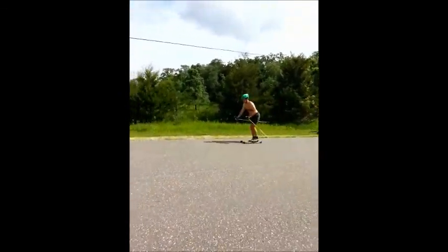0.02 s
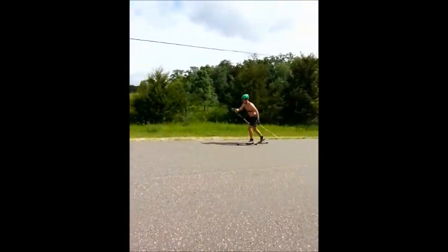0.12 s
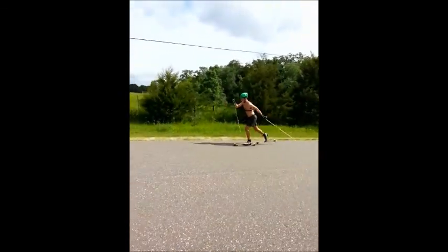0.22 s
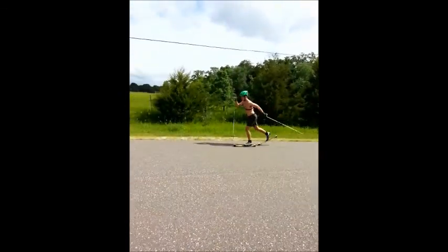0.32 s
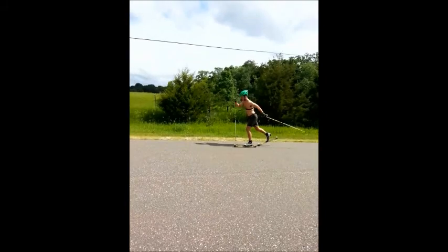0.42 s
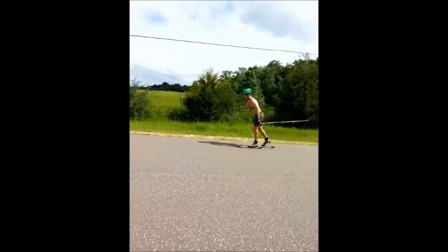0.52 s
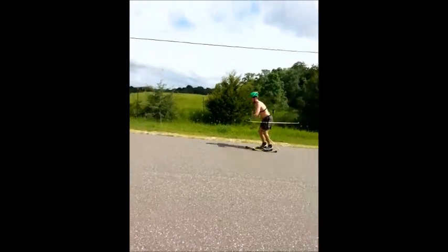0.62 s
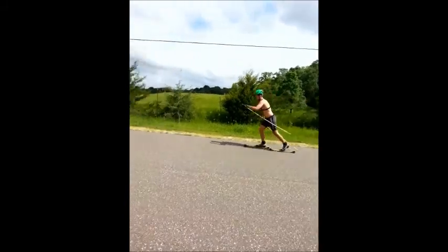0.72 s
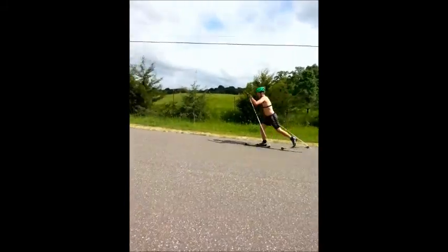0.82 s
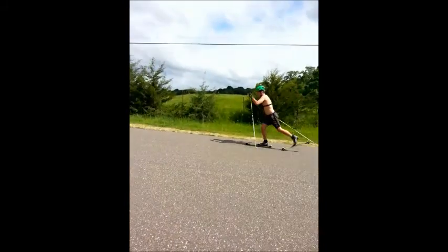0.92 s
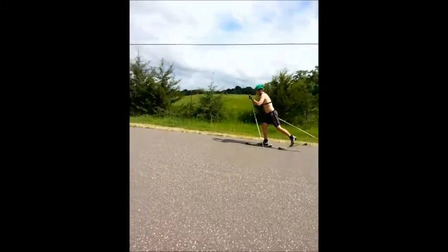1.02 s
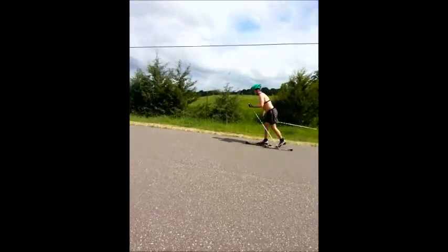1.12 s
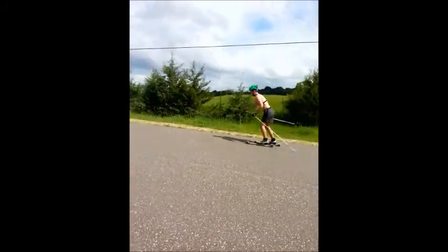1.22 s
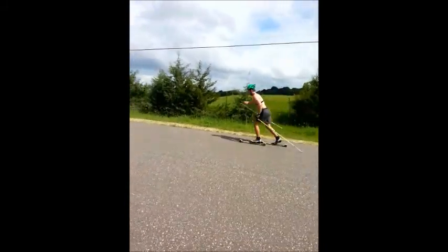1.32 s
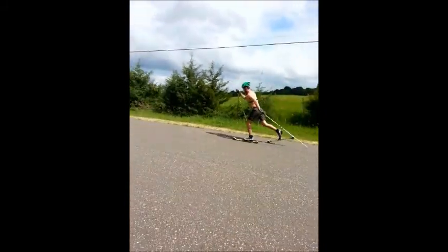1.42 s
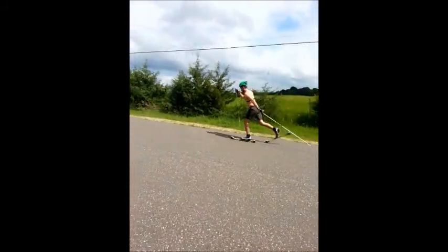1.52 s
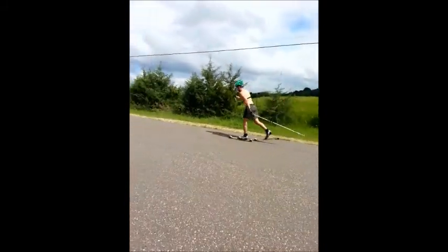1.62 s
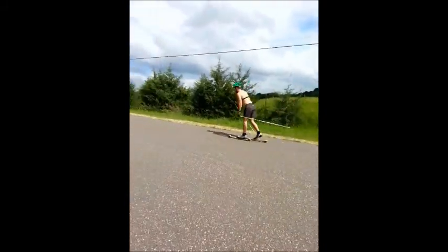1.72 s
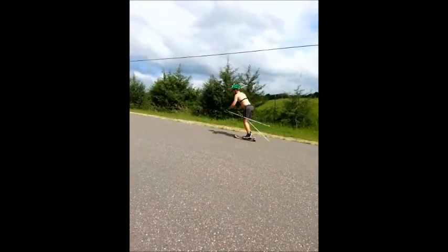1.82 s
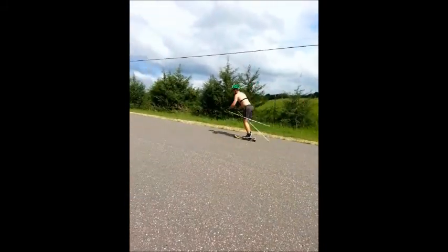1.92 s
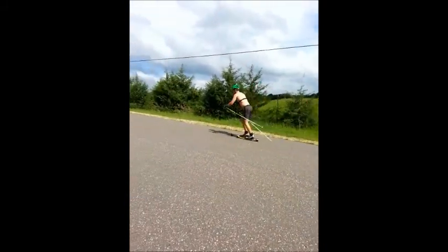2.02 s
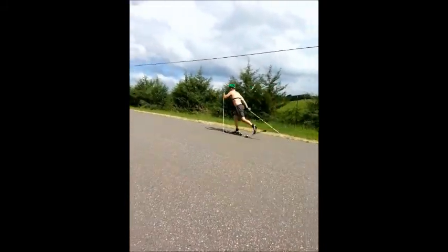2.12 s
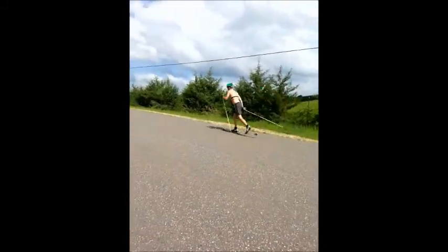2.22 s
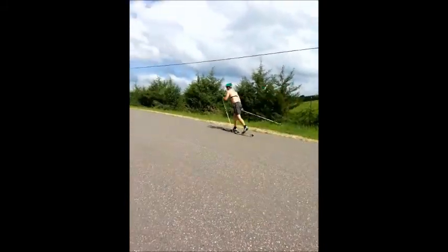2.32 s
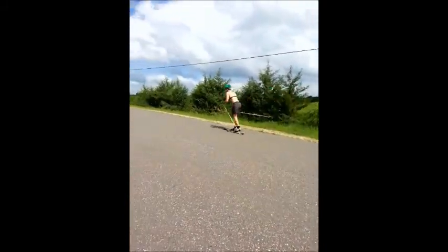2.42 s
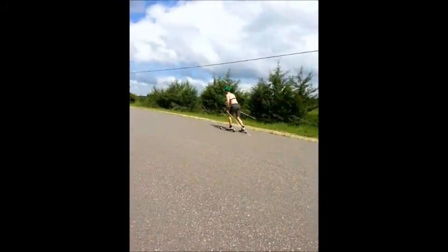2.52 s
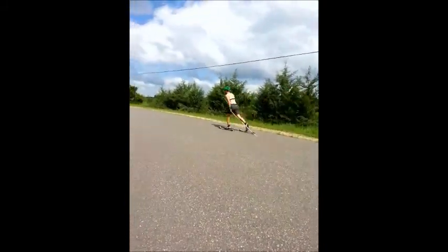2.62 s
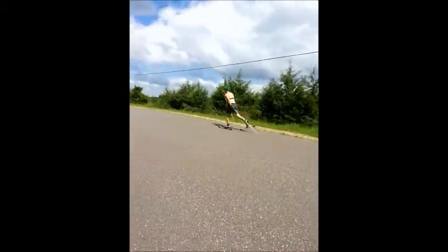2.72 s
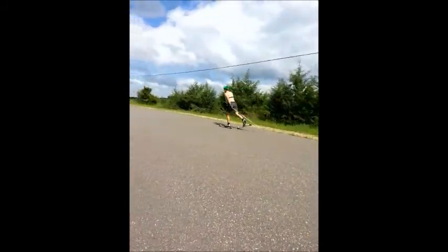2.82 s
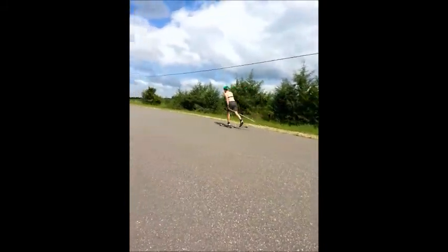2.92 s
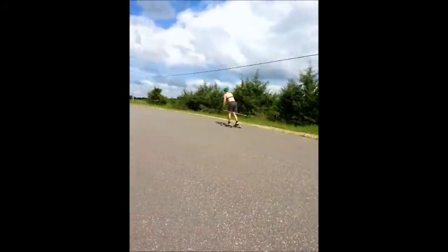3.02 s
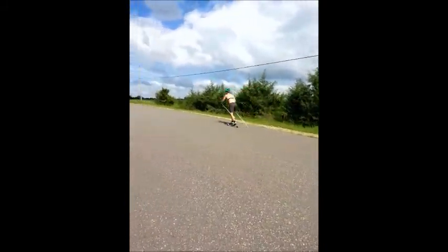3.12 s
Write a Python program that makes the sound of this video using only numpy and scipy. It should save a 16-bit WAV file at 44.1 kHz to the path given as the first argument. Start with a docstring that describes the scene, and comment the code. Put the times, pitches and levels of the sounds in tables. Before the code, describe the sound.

Roller ski pole tips click sharply on asphalt, over wind thumps and high insect drone.

```python
"""Roller skier on an asphalt road

Steel pole tips strike and bounce, and the skis slap down in turn, each ringing briefly.
The wheels hiss on the rough road, and something on the gear ticks in runs, once a stride.
Insects drone in the verge and gusts of wind thump on the microphone."""
import sys
import numpy as np
from scipy import signal
from scipy.fft import rfft, irfft, next_fast_len
from scipy.io import wavfile
from scipy.ndimage import map_coordinates

SR = 44100
rng = np.random.default_rng(int(sys.argv[2]) if len(sys.argv) > 2 else 0)


def generate_wav(signal):
    """Clip the signal to [-1, 1] and save it as 16-bit WAV at the path in sys.argv[1]."""
    frames = np.transpose(np.atleast_2d(signal))
    scaled = np.clip(frames, -1, 1) * 32767
    pcm = np.round(scaled).astype(np.int16)
    wavfile.write(sys.argv[1], SR, pcm)


N = 138915

# The tones a pole rings with: pitch_hz, level_db, fade_s (time to fall by 60 dB)
POLE_TONES = [(695, -13, 0.036), (1213, -2, 0.016), (1568, -3, 0.012), (2270, -7.5, 0.02),
              (2557, -4.5, 0.0065), (3090, -6.5, 0.018), (4440, -12, 0.021), (5580, -8.5, 0.024),
              (7000, -6.5, 0.0041), (11400, -18.5, 0.026)]
# Tip hits and bounces: start_s, level_db, knock_db, treble_db (both added to the level), ring_hz
POLE_HITS = [(0.1234, -37, 0, -3, 1180), (.135, -32.5, -7, -0.5, 2700), (0.4042, -21.5, -13.5, -7, 2520),
             (0.4142, -29.5, -31, -7, 3100), (0.7464, -24.5, -3.5, -4.5, 2530),
             (.756, -21.5, -5, -2.5, 2870), (0.967, -35, 1, -18, 2190), (0.9758, -19, -1, -6.5, 2290),
             (0.9855, -23.5, -2, -6.5, 2300), (1.023, -25.5, -10, -11, 2260),
             (1.0314, -21.5, -14.5, -11, 2330), (1.136, -34, 0.5, -20, 1050),
             (1.334, -29.5, -13, -3.5, 2443), (1.344, -29, -14, -4, 3070), (1.6209, -29, -4.5, -7.5, 1940),
             (1.6305, -25, -11.5, -16, 1980), (1.641, -29, -11, -6, 2995), (1.649, -31, -10, -9, 2330),
             (1.6591, -30, -13, -17, 2980), (1.69, -28.5, -15, -10.5, 2950), (1.9594, -23, -10.5, -5, 1920),
             (1.9692, -22.5, -4, -0.5, 3260), (2.179, -29.5, -1.5, -4.5, 1550),
             (2.188, -14, -10.5, -11.5, 2030), (2.1981, -22, -10, -9, 1970), (2.572, -36, -0.5, 1, 1490),
             (2.5828, -33.5, -9, 1, 1920), (2.7843, -41, 0.5, -5.5, 1460), (2.8289, -26, -10, -7, 1920),
             (2.8381, -26.5, -16, -6.5, 1970)]
def poles():
    """Steel tips hit the road, and each hard, short contact rings the shaft."""
    out = np.zeros(N)
    for start_s, level_db, knock_db, treble_db, ring_hz in POLE_HITS:
        hit = strike(POLE_TONES, contact_s=0.0016, rise_s=0.00034,
                     crack_db=1, crack_fade_s=0.012, detune=0.014)
        hit = turn_away(boost_ring(hit, ring_hz), start_s, db_per_s=2.5)
        add(out, start_s, amp(level_db) * balance(hit, knock_db, treble_db))
    return out


# The tones of a glancing hit: pitch_hz, level_db, fade_s
GLANCE_TONES = [(704, -19, 0.017), (1680, -11.5, 0.018), (2640, 0, 0.015), (3503, 2.5, 0.0079),
                (4326, 2, 0.0094), (5420, 1.5, 0.01), (5790, 0.5, 0.013), (7740, 0.5, 0.0012)]
def glancing_tip():
    """One tip glances hard off the road and rings higher."""
    out = np.zeros(N)
    hit = strike(GLANCE_TONES, contact_s=0.0013, rise_s=0.00025,
                 crack_db=-8.5, crack_fade_s=0.024, detune=0.0036)
    add(out, 0.2041, amp(-8.5) * unit_hit(hit))
    return out


# The tones a ski frame rings with: pitch_hz, level_db, fade_s
SKI_TONES = [(621, -8, 0.0047), (1126, -8.5, 0.028), (1518, 1.5, 0.015), (2224, -4.5, 0.022),
             (2640, -6, 0.012), (3027, -3, 0.019), (4885, -5, 0.031), (5650, 2.5, 0.026),
             (7160, -2.5, 0.022)]
# Ski landings: start_s, level_db, knock_db, treble_db (both added to the level), ring_hz
SKI_LANDINGS = [(0.7889, -16, -7, -9.5, 2500), (1.4068, -25.5, -0.5, -5.5, 2870),
                (2.0081, -15, -8, -8, 2680), (2.6431, -25, 2.5, -2.5, 1110)]
def skis():
    """Wheels and frame land with a longer, softer clack."""
    out = np.zeros(N)
    for start_s, level_db, knock_db, treble_db, ring_hz in SKI_LANDINGS:
        hit = strike(SKI_TONES, contact_s=0.0035, rise_s=0.0014,
                     crack_db=-1, crack_fade_s=0.015, detune=0.012)
        add(out, start_s, amp(level_db) * balance(boost_ring(hit, ring_hz), knock_db, treble_db))
    return out


# The crack's colour (how strong its noise is at each pitch): pitch_hz, level_db
CRACK_COLOUR = [(200, -23), (600, -11), (3000, -1), (4050, -3), (5600, 2.5), (8000, -11.5), (12000, -16),
                (16000, -18.5)]
def strike(tones, contact_s, rise_s, crack_db, crack_fade_s, detune):
    """A gritty contact gives a crack of noise and rings the tones, a little differently each time."""
    t = np.arange(SR // 10) / SR
    rise = 1 - np.exp(-t / rise_s)
    since_contact = np.maximum(t - contact_s, 0)
    ring = 0
    for hz, db, fade_s in tones:
        level_shift, pitch_shift, phase = rng.standard_normal(3)
        fade = amp(db + 2 * level_shift - 60 * since_contact / fade_s)
        ring = ring + fade * np.sin(2 * np.pi * (hz * (1 + detune * pitch_shift) * t + phase))
    crack = amp(-60 * since_contact / crack_fade_s) * noise(CRACK_COLOUR, size=len(t))
    return unit_hit(rise * ring) + amp(crack_db) * unit_hit(rise * crack)


def boost_ring(x, hz, ring_db=4.5, width_hz=170):
    """Bring out the one tone that this contact rings most."""
    return x + amp(ring_db) * signal.lfilter(*signal.iirpeak(hz, hz / width_hz, fs=SR), x)


def balance(x, knock_db, treble_db, knock_hz=1400, treble_hz=3800):
    """Give a hit its own share of dull knock and bright treble around the middle pitches."""
    bands = [(knock_hz, "low", knock_db), ((knock_hz, treble_hz), "band", 0),
             (treble_hz, "high", treble_db)]
    out = 0
    for hz, kind, db in bands:
        band = signal.sosfilt(signal.butter(6, hz, kind, fs=SR, output="sos"), x)
        out = out + amp(db) * unit_hit(band)
    return out


def turn_away(x, start_s, db_per_s, neutral_s=1.95, above_hz=8000):
    """The skier turns away: early hits get more of the highest treble, late ones less."""
    return filtered(x, lambda hz: amp(-db_per_s * (start_s - neutral_s) * (hz > above_hz)))


# The colour of a tick: pitch_hz, level_db
METAL_COLOUR = [(1000, -36), (3000, 7.5), (4600, -13), (5800, 12), (7200, 6), (8500, -12.5), (10500, -13),
                (12500, -46)]
# Ticks of the gear: start_s, level_db
GEAR_TICKS = [(.675, -36), (0.6983, -37.5), (0.721, -40), (.826, -35.5), (0.8563, -35.5), (0.8749, -36),
              (0.9423, -39), (1.8947, -38.5), (1.923, -36.5), (1.943, -37), (2.004, -33), (2.046, -35.5),
              (2.108, -41), (2.132, -38.5), (2.161, -39), (2.265, -39), (3.111, -40.5), (3.1365, -41)]
def ticks(rise_s=0.0005, fade_s=0.012):
    """A small metal part gives thin, scratchy ticks, duller as the skier moves away."""
    out, t = np.zeros(N), np.arange(SR // 30) / SR
    shape = (1 - np.exp(-t / rise_s)) * amp(-60 * t / fade_s)
    for start_s, level_db in GEAR_TICKS:
        scratch = turn_away(noise(METAL_COLOUR, size=len(t)), start_s, db_per_s=8)
        add(out, start_s, amp(level_db) * unit_hit(shape * scratch))
    return out


# How loud the wheels are: time_s, level_db
WHEEL_LEVELS = [(0, -39.5), (.18, -44), (.38, -43.5), (.45, -40.5), (.68, -45), (.83, -42), (1.3, -46),
                (1.7, -44.5), (2.27, -43.5), (2.45, -49.5), (2.92, -46.5), (3.15, -54)]
# The colour of their hiss: pitch_hz, level_db
WHEEL_COLOUR = [(150, -1), (400, -9), (640, 5), (870, -10.5), (1150, 1), (1400, -4), (2400, 0.5),
                (3100, -2), (4000, -9), (5000, -9), (7500, -19), (16000, -30)]
def wheels():
    """Wheels hiss unevenly on the rough asphalt."""
    level_db = curve(WHEEL_LEVELS) + 0.89 * wobble(44.18) + 1.7 * wobble(350)
    return amp(level_db) * noise(WHEEL_COLOUR)


# Short skids: start_s, length_s, level_db, ring_hz
TIP_SKIDS = [(0.768, 0.034, -35, 2400), (1.972, 0.021, -28, 2310), (2.376, .02, -33.5, 1540),
             (1.625, 0.048, -38, 2200), (2.85, 0.032, -34.5, 3070), (2.875, 0.043, -33.5, 2750)]
def skids():
    """A tip scrapes over grit, and the sound fades as it grips."""
    colour = [(300, -32), (1500, 3.5), (2800, -2), (4200, -6),  # pitch_hz, level_db
              (6500, -5.5), (9000, -17), (16000, -38)]
    grit = unit(amp(3.3 * wobble(500)) * noise(colour))
    out = np.zeros(N)
    for start_s, length_s, level_db, ring_hz in TIP_SKIDS:
        shape = curve([(start_s, 0), (start_s + 0.0066, 1),
                       (start_s + length_s / 2, 0.82), (start_s + length_s, 0.02)])
        scrape = unit(boost_ring(boost_ring(grit, ring_hz), ring_hz))
        out += amp(level_db) * shape * scrape
    return out


# The colour of the echo: pitch_hz, level_db
ECHO_COLOUR = [(300, -15.5), (1200, -1), (2500, 4), (4000, -4), (6000, -8), (10000, -19.5), (11800, -16),
               (13000, -22)]
def roadside_echo(hits, fade_s=0.14):
    """Road and bushes scatter each hit into a short wash of noise."""
    t = np.arange(SR // 3) / SR
    tail = amp(-60 * t / fade_s) ** 2
    energy = signal.fftconvolve(hits ** 2, tail / tail.sum())[:N]
    return np.sqrt(np.abs(energy)) * noise(ECHO_COLOUR)


# How strong the wind is: time_s, level_db
GUST_LEVELS = [(0, -53), (.47, -43), (.53, -62), (.7, -52.5), (.81, -32), (.91, -53), (1.08, -53),
               (1.2, -41), (1.33, -49), (1.37, -28), (1.52, -33), (1.59, -54), (1.92, -50), (2.0, -36),
               (2.15, -46.5), (2.19, -22), (2.26, -30), (2.34, -41), (2.66, -35), (2.87, -37.5),
               (2.94, -49.5), (3.07, -51), (3.15, -41.5)]
# The colour of its rumble: pitch_hz, level_db
RUMBLE_COLOUR = [(30, -36), (50, -6.5), (90, -4), (170, -2.5), (300, -7), (500, -19), (900, -37),
                 (2500, -85)]
# Swirls of air hitting the microphone: middle_s, level_db, pitch_hz
WIND_THUMPS = [(0.482, -29, 110), (1.364, -16.5, 236), (1.433, -14.5, 131), (1.47, -21.5, 219),
               (1.507, -17, 128.3), (1.529, -13, 182), (2.237, -7, 237), (2.26, -11.5, 173),
               (2.513, -19, 125), (2.611, -18, 176), (2.661, -21.5, 190), (2.747, -17, 138)]
def wind(flutter_db=2.8, brightening=0.22):
    """Wind rumbles on the microphone, brighter in strong gusts, and single swirls thump."""
    gust_db = curve(GUST_LEVELS)
    rumble = noise(RUMBLE_COLOUR)
    deep = filtered(rumble, lambda hz: 1 / (1 + (hz / 130) ** 4))
    neutral_db = (gust_db.max() + gust_db.mean()) / 2
    tilt = amp(brightening * (gust_db - neutral_db))
    out = amp(gust_db + flutter_db * wobble(39.91)) * (deep / tilt + (rumble - deep) * tilt)
    t = np.arange(-SR // 20, SR // 20) / SR
    for middle_s, level_db, hz in WIND_THUMPS:
        swell = np.exp(-(t * hz / 0.52) ** 2)  # lasts a cycle or two
        tone = np.sin(2 * np.pi * hz * t + rng.uniform(-1.6, 1))
        add(out, middle_s + t[0], amp(level_db) * swell * tone)
    return out


# The colour of the insect chorus: pitch_hz, level_db
CHORUS_COLOUR = [(3500, -42), (4800, -25), (5300, 8), (5700, 4), (6150, 2), (6600, -9), (8000, -62)]
def insects(chirps_per_s=18, chirp_s=0.034, pitch_hz=5610, fall_hz=690):
    """A high chorus drones while one nearer insect sings quick, raspy chirps that fall in pitch."""
    chorus = amp(-53 + 1.1 * wobble(25.2) + wobble(2.05)) * noise(CHORUS_COLOUR)
    song = np.zeros(N)
    size = round(chirp_s * SR)
    progress = np.linspace(-0.5, 0.5, size)
    rasp = 0.85 * wobble(600)
    for k, (time_shift, pitch_shift, level_shift) in enumerate(rng.standard_normal((80, 3))):
        hz = pitch_hz + 110 * pitch_shift - fall_hz * progress
        phase = 2 * np.pi * np.cumsum(hz) / SR + np.roll(rasp, -k * size)[:size]
        chirp = amp(2 * level_shift) * np.cos(np.pi * progress) * np.sin(phase)
        add(song, (k + 0.081 * time_shift) / chirps_per_s, chirp)
    return chorus + amp(-54) * unit(song)


# The colour of the outdoor hush: pitch_hz, level_db
AIR_COLOUR = [(100, 9), (500, 30.5), (1500, 17), (4000, -3), (8000, 6), (15000, 12)]
def air():
    """A faint, steady hush lies behind everything."""
    return amp(-57.5) * noise(AIR_COLOUR)


def amp(db):
    """Turn decibels into a number to multiply by."""
    return 10 ** (np.asarray(db) / 20)


def unit(x):
    """Scale a sound to an average strength (rms) of 1."""
    return x / np.sqrt(np.mean(x ** 2) + 1e-20)


def unit_hit(x, length_s=0.008):
    """Give a hit the energy of a sound of strength 1 lasting length_s."""
    return x / np.sqrt(np.sum(x ** 2) / (length_s * SR) + 1e-20)


def curve(rows):
    """Join (time_s, value) points with straight lines."""
    return np.interp(np.arange(N) / SR, *np.transpose(rows))


def wobble(per_s):
    """A smooth curve through per_s random values a second."""
    return map_coordinates(rng.standard_normal(N // 8), [np.arange(N) * per_s / SR], mode="wrap")


def filtered(x, gain_at):
    """Turn each pitch in x up or down by gain_at(hz)."""
    size = next_fast_len(len(x) + 8192)
    return irfft(rfft(x, size) * gain_at(np.fft.rfftfreq(size, 1 / SR)), size)[:len(x)]


def noise(colour, size=N):
    """Noise of strength 1, shaped by (pitch_hz, level_db) points."""
    pitch_hz, level_db = np.transpose(colour)
    white = rng.standard_normal(size)
    return unit(filtered(white, lambda hz: amp(np.interp(np.log(hz + 1), np.log(pitch_hz + 1), level_db))))


def add(out, start_s, x):
    """Mix x into out from start_s on."""
    part = out[max(round(start_s * SR), 0):][:len(x)]
    part += x[:len(part)]


def scene():
    """The skier among wind, insects and still air."""
    hits, glance = poles() + skis(), glancing_tip()
    echo = amp(-10) * roadside_echo(hits + amp(-9) * glance)
    skier = hits + glance + ticks() + echo + wheels() + skids()
    return (skier + wind() + insects() + air())[None]


def record(dry, low_hz=42, top_hz=16100):
    """The microphone drops the deepest bass, clips the loudest click and cuts the highest treble."""
    heard = filtered(dry[0], lambda hz: 1 - 1 / (1 + (hz / low_hz) ** 6))
    return filtered(np.clip(heard, -1, 1), lambda hz: 1 / (1 + (hz / top_hz) ** 80))[None]


dry = scene()
out = record(dry)
generate_wav(out)
```